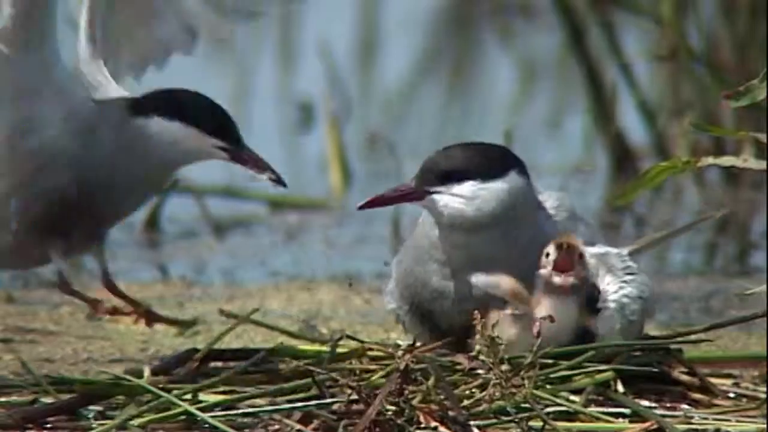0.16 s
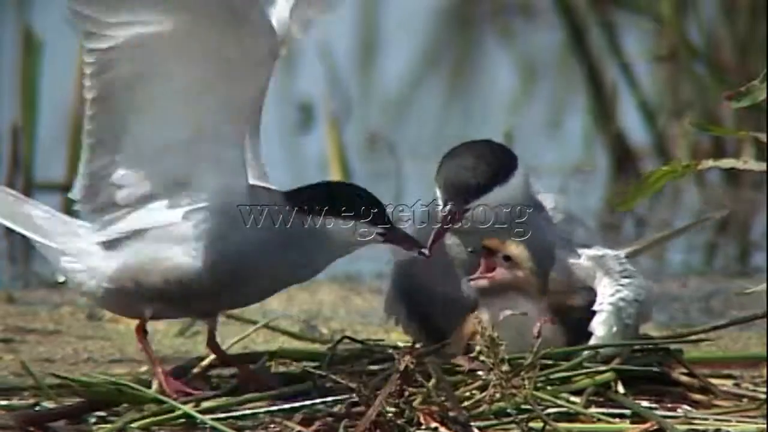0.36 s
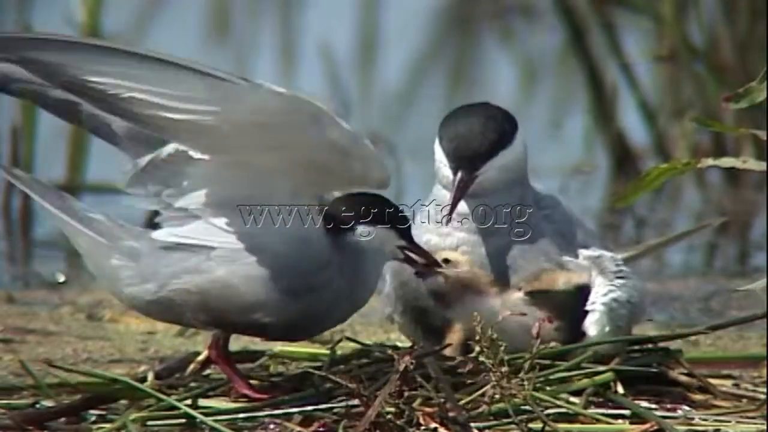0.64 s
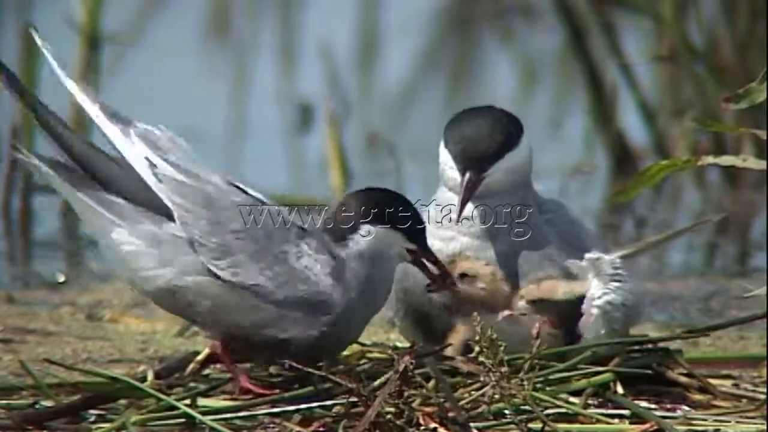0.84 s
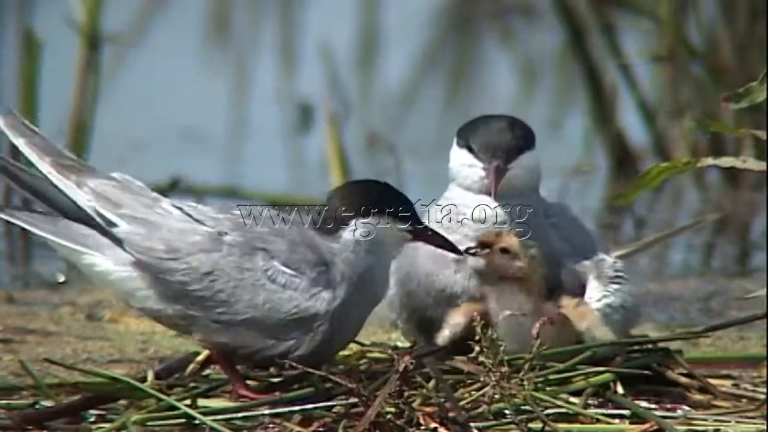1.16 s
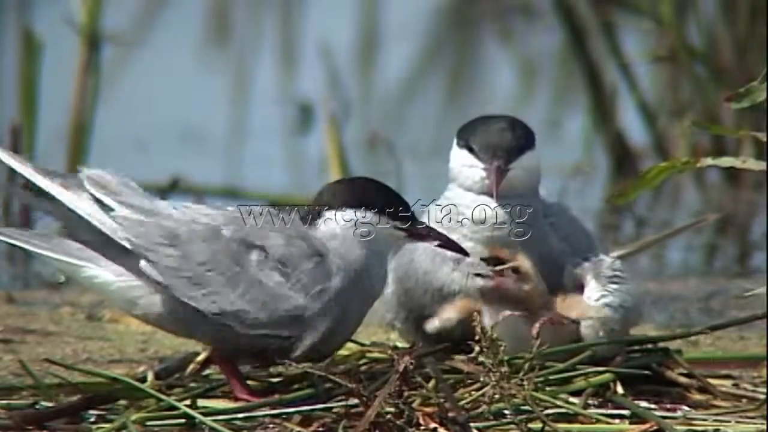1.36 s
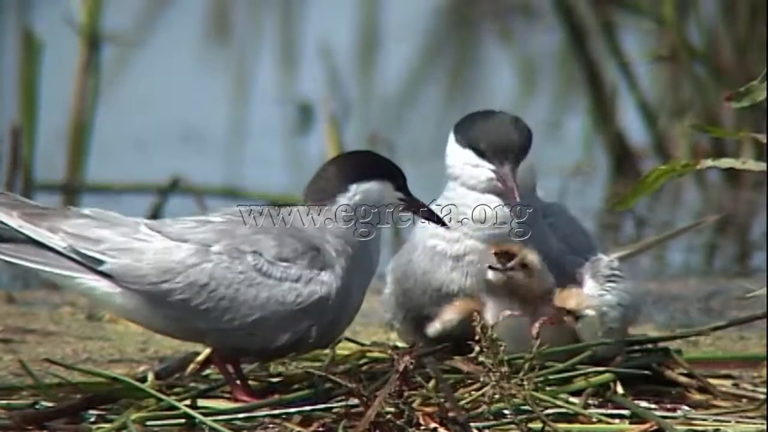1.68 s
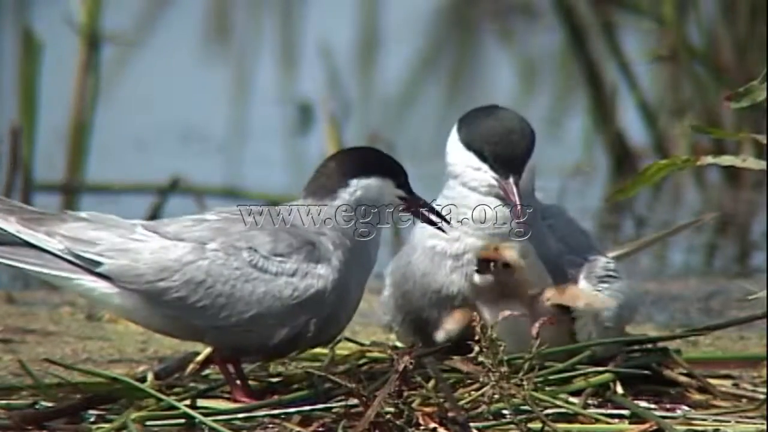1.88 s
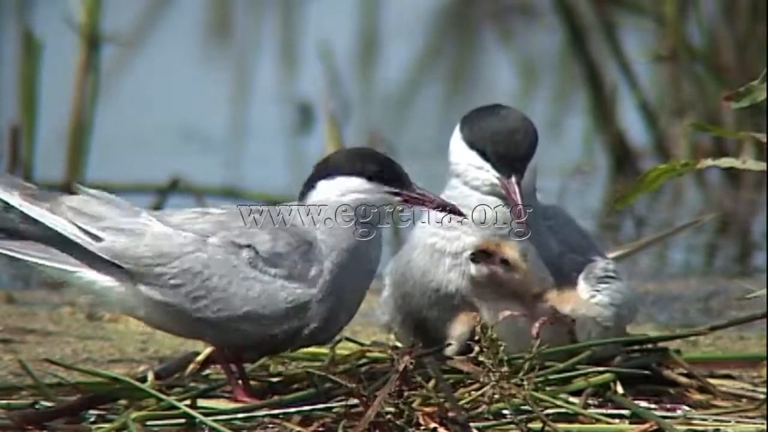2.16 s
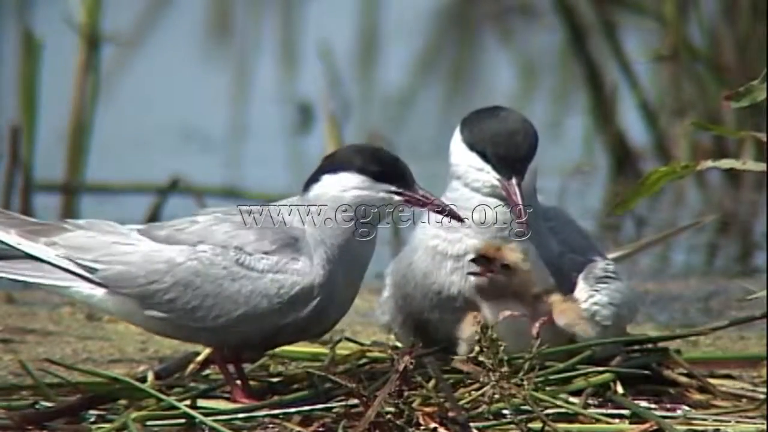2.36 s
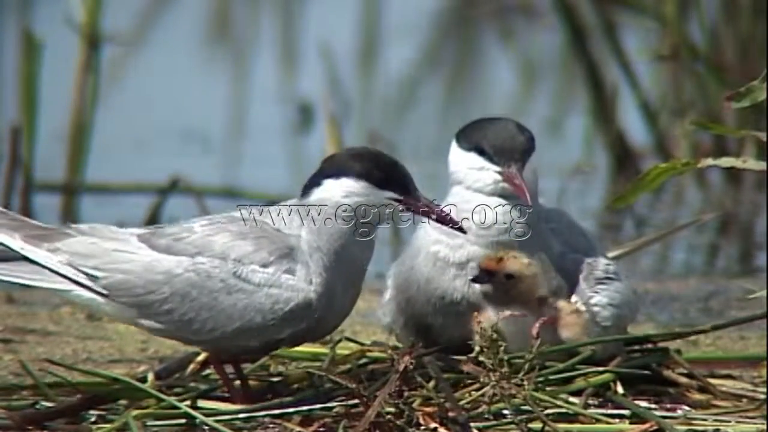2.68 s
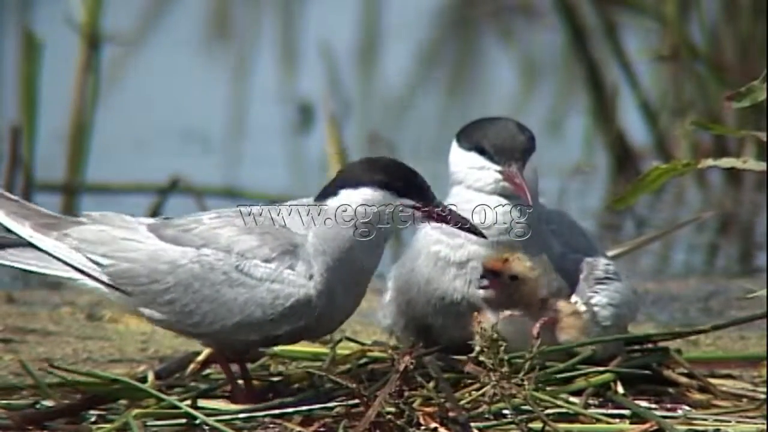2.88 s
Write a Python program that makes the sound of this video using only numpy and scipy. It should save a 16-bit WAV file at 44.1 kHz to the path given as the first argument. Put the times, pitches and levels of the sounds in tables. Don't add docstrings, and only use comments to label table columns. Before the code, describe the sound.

Terns rasp harshly close by, each call a rapidly throbbing 0.13-second burst: at 0.13, loudest at 1.0, weaker at 2.2 seconds. An abrupt opening brings distant rasps; a clear whistle dips at 0.25-0.45. Chick peeps, croaks and husky notes scatter throughout, with soft frog rattles near 0.35 and 1.65 and a tiny plop at 2.2. Wind rumble strengthens after 1.5 over faint colony hiss, nearly mono, with short reed echoes.

```python
import sys
import numpy as np
from scipy import signal
from scipy.fft import rfft, irfft
from scipy.io import wavfile
from scipy.ndimage import uniform_filter1d

SR = 44100
rng = np.random.default_rng(int(sys.argv[2]) if len(sys.argv) > 2 else 0)


def undo_db(level):
    steps = np.asarray(level, float) / 20
    return 10 ** steps


def to_wav(s):
    ch = np.atleast_2d(s).T
    pcm = np.round(np.clip(ch, -1, 1) * 32767)
    wavfile.write(sys.argv[1], SR, pcm.astype(np.int16))


N = 133623


def walk(n, rate):
    k = max(int(SR / rate), 1)
    return uniform_filter1d(uniform_filter1d(rng.standard_normal(n), k), k) * np.sqrt(2.2 * k)


def along(length_s):
    return np.linspace(0, 1, int(length_s * SR))


def table(points, hz):
    p = np.array(points, float)
    return np.interp(np.log(np.maximum(hz, 1)), np.log(p[:, 0]), p[:, 1], left=-80, right=-80)


def coloured(points, db):
    spectrum = rfft(rng.standard_normal(N))
    x = irfft(spectrum * undo_db(table(points, np.fft.rfftfreq(N, 1 / SR))), N)
    return x * undo_db(db) / x.std()


def add(out, start_s, x, db, attack_s=0.0013, release_s=0.0054):
    t = np.arange(len(x)) / SR
    ends = np.clip(np.minimum(t / attack_s, (t[-1] - t) / release_s), 0, 1)
    x = x * undo_db(db) / x.std() * ends
    i = int(start_s * SR)
    x = x[:N - i]
    out[i:i + len(x)] += x


def voice(hz, gain, rough, count):
    k = np.arange(1, count + 1)[:, None]
    flicker = 1 - rough + rough * walk((count, 9000), 550)[:, :len(hz)]
    phase = 2 * np.pi * np.cumsum(hz) / SR
    return np.sum(gain(k * hz) * flicker * np.sin(k * phase + k * k), axis=0)


def throb(bursts, duty, scatter_db, smear):
    x = np.clip((bursts % 1) / duty, 0, 1)
    size = undo_db(scatter_db * rng.standard_normal(40))[bursts.astype(int)]
    return (np.abs(np.sin(np.pi * x ** .6)) ** .8 + smear) * size


def near_rasps():
    # start in seconds, length in seconds, level in dB, throb in Hz, voice-organ pitch in Hz
    rasps = [
        (0.129, 0.13, -52.5, 103.8, 625.7),
        (1.0058, 0.13, -48.5, 99.9, 652),
        (2.214, 0.12, -56, 96.4, 519),
    ]
    # throat resonance at the start in Hz, at the end in Hz, its width in Hz,
    # slide time in seconds, every how many harmonics one is strong
    throats = [
        (3200, 2750, 500, .03, 5),
        (3850, 2350, 400, .013, 2),
        (3700, 3300, 800, .05, 2),
    ]
    # frequency in Hz, level in dB
    colour = [(900, -15.5), (1900, -4), (4500, -2), (6700, -7.5), (9400, -12.5), (11000, -22.5),
              (15000, -32)]
    dulling = (0.5, 0, -8)
    fading = (-1.5, -1, -2)
    peak_db, sag, jitter = 9, .06, .014

    out = np.zeros(N)
    for (start, length, db, rate, hz), throat, dull, fade in zip(rasps, throats, dulling, fading):
        first_hz, last_hz, wide, slide, every = throat
        u = along(length)
        t = u * length
        bursts = t * rate - 0.214 * (1 - np.exp(-t / 0.017))
        mouth = last_hz + (first_hz - last_hz) * np.exp(-(t / slide) ** 2)
        uneven = jitter * rng.standard_normal(40)[np.abs(bursts).astype(int)]
        pitch = hz * (1 + sag * (.4 - bursts % 1) + uneven)

        def gain(f):
            weak_db = -6 * (np.round(f / pitch) % every > 0) * (f > 3500)
            dull_db = dull * np.maximum(f / 1000 - 6, 0)
            resonance = 1 + undo_db(peak_db) / (1 + ((f - mouth) / wide) ** 2)
            return undo_db(table(colour, f) + weak_db + dull_db) * resonance

        x = voice(pitch, gain, rough=.42, count=22)
        x = x * throb(bursts, duty=.92 * (1 - 0.5 * u ** 2), scatter_db=1.2, smear=.06)
        add(out, start, x * undo_db(fade * u ** 2), db, attack_s=.0005, release_s=.002)
    return out


def far_rasps():
    # start in seconds, length in seconds, level in dB, throat in Hz, throat width as a share
    rasps = [(0.067, 0.038, -48.5, 1884, .25), (0.068, 0.034, -56, 5435, 0.17),
             (0.072, 0.067, -53, 3007, 0.19), (0.242, .11, -63.5, 5510, 0.28),
             (.345, 0.033, -66, 7270, 0.17), (0.442, 0.024, -60.5, 6500, 0.18),
             (.542, 0.11, -61.5, 2560, 0.44), (0.545, 0.082, -69.5, 5340, 0.17),
             (0.641, 0.18, -68.5, 5400, 0.15), (.705, 0.061, -56.5, 2117, 0.47),
             (.706, .05, -64, 5300, 0.23), (0.819, .02, -67.5, 5800, .1), (1.14, 0.15, -65, 2937, 0.28),
             (1.336, 0.028, -68.5, 6040, 0.11), (1.378, 0.092, -68, 5830, .1),
             (1.421, 0.12, -67.5, 3680, 0.25), (1.571, 0.0276, -57.5, 4250, 0.076),
             (1.572, 0.097, -61, 5640, 0.11), (1.598, 0.086, -68.5, 2392, 0.28),
             (1.807, 0.012, -60.5, 6110, 0.071), (1.955, 0.064, -67.5, 2480, 0.19),
             (2.051, 0.027, -61.5, 2310, 0.5), (2.098, 0.03, -61.5, 1920, 0.45)]
    more_rasps = [
        (.1, .15, -61, 5400, 0.22),
        (.385, .06, -77, 7600, .1),
        (2.11, .085, -74.5, 6300, 0.072),
        (2.16, 0.074, -61, 3540, 0.19),
        (2.285, 0.115, -58.5, 2504, 0.35),
        (2.84, .18, -74, 6250, 0.11),
        (2.55, 0.089, -71.5, 5850, 0.063),
        (2.68, 0.073, -63.5, 3180, 0.19),
        (2.768, 0.07, -67, 5770, 0.073),
        (2.84, .18, -72, 3550, 0.14),
    ]
    usual_hz, slide, throb_hz = 639, 0.0305, 100.2

    out = np.zeros(N)
    for start, length, db, centre, wide in rasps + more_rasps:
        u = along(length)
        pitch_luck, throb_luck = rng.standard_normal(2)
        mouth = centre * (1 + slide * (1 - 2 * u))
        pitch = mouth / np.round(centre / usual_hz) * (1 + 0.01064 * pitch_luck)
        x = voice(pitch, lambda f: 1 / (1 + ((f - mouth) / (wide * centre)) ** 4),
                  rough=min(.8, 0.44 + 2 * wide), count=14)
        bursts = u * length * throb_hz * (1 + .08 * throb_luck)
        add(out, start, x * throb(bursts, duty=.85, scatter_db=1.7, smear=.5), db, attack_s=.002)
    return out


def croaks():
    # start in seconds, length in seconds, level in dB, pitch in Hz, loudest near in Hz
    calls = [
        (1.29, 0.064, -60, 1170, 2100),
        (1.549, 0.05, -56, 1170, 2130),
        (2.097, 0.085, -59, 1170, 2250),
        (2.33, 0.046, -56.5, 1170, 2000),
        (2.655, 0.059, -66.5, 1260, 1200),
        (2.928, 0.069, -66.5, 1250, 1360),
        (2, .035, -64.5, 1800, 3500),
        (1.625, 0.055, -62.5, 2050, 2600),
    ]
    out = np.zeros(N)
    for start, length, db, hz, centre in calls:
        u = along(length)
        x = voice(hz * (1 - 0.05 * u ** 2), lambda f: 1 / (1 + ((f - centre) / 650) ** 2),
                  rough=.6 if hz < 1200 else .15, count=5)
        add(out, start, x * np.exp(-u), db)
    return out


def husky_notes():
    # start in seconds, length in seconds, level in dB, start pitch in Hz, end pitch in Hz
    glides = [(0.062, 0.028, -69.5, 7750, 7600), (0.069, 0.025, -75, 11200, 11000),
              (0.261, .11, -83, 11500, 11800), (.35, .025, -75, 11700, 11500),
              (.43, .04, -81, 11800, 11500), (0.547, .055, -70.5, 6050, 5900),
              (0.561, 0.091, -61.5, 2950, 2350), (.56, .07, -83, 9900, 9800), (.63, 0.091, -66, 5050, 5700),
              (0.713, .095, -66.5, 5650, 5150), (.75, .04, -68, 2300, 1900),
              (1.17, 0.11, -72.5, 2050, 1850), (1.2, .045, -71, 3700, 3900), (1.573, .085, -78, 8300, 8100),
              (1.601, 0.064, -64, 2950, 2650), (1.69, 0.023, -70, 5400, 5500),
              (1.72, .2, -75.5, 3650, 3950), (1.817, 0.043, -77, 6600, 6700),
              (2.246, 0.027, -61.5, 5200, 5150), (2.398, .11, -71.5, 2450, 2250),
              (2.488, 0.094, -77, 4500, 4550), (2.52, 0.079, -71, 3000, 3150),
              (2.685, 0.058, -72.5, 1900, 1850), (2.742, 0.16, -76, 3780, 3760),
              (2.901, 0.062, -69, 3300, 3100), (2.95, 0.033, -73, 5030, 5000),
              (2.97, 0.073, -69, 3500, 3350)]
    out = np.zeros(N)
    for start, length, db, first_hz, last_hz in glides:
        u = along(length)
        wobble = 1 + .012 * walk(9000, 150)[:len(u)]
        x = voice((first_hz + (last_hz - first_hz) * u) * wobble, lambda f: 1, rough=.45, count=1)
        add(out, start, x, db, attack_s=.006, release_s=.01)
    return out


def long_whistle():
    # time in seconds, pitch in Hz, level in dB
    path = [
        (0.25, 3540, -55),
        (0.27, 3550, -50.5),
        (0.308, 3376, -53.5),
        (0.338, 3566, -53),
        (0.352, 3500, -61),
        (0.364, 3572, -58),
        (0.392, 3510, -70),
        (0.416, 3651, -71),
        (0.45, 3630, -67),
    ]
    times, pitches, levels = np.array(path).T
    length = times[-1] - times[0]
    t = times[0] + along(length) * length
    level = undo_db(np.interp(t, times, levels) + 1.1 * walk(len(t), 90))
    x = voice(np.interp(t, times, pitches), lambda f: 1, rough=0.16, count=1) * level
    out = np.zeros(N)
    add(out, times[0], x, 20 * np.log10(x.std() * np.sqrt(2)))
    return out


def bird_note(out, start, length, db, hz, arch, wobble):
    u = along(length)
    pitch_walk, level_walk = walk((2, 9000), 80)[:, :len(u)]
    bend = arch * np.abs(2 * u - 1.05) ** 2.58
    x = voice(hz * (1 - bend + wobble * pitch_walk), lambda f: 1, rough=0.11, count=1)
    add(out, start, x * undo_db(level_walk - 56 * bend), db, attack_s=.004, release_s=.006)


def level_whistles():
    # start in seconds, length in seconds, level in dB, pitch in Hz
    calls = [
        (.525, 0.063, -63.5, 3300),
        (2.605, 0.089, -69.5, 3100),
        (2.665, 0.069, -66.5, 3774),
        (2.668, 0.07, -72, 5020),
        (2.62, 0.054, -70, 4500),
        (2.79, 0.061, -69, 3090),
        (2.88, 0.078, -67.5, 4680),
        (2.94, 0.051, -64.5, 3816),
    ]
    out = np.zeros(N)
    for row in calls:
        bird_note(out, *row, arch=0, wobble=0.0091)
    return out


def chick_peeps():
    # start in seconds, length in seconds, level in dB, top pitch in Hz
    calls = [(.457, 0.049, -65, 4720), (.826, 0.056, -68.5, 4520), (1.185, 0.06, -68, 4570),
             (1.312, 0.061, -69.5, 4750), (1.457, 0.037, -66.5, 4760), (1.528, 0.057, -65, 4550),
             (1.605, 0.042, -66, 4700), (1.765, 0.047, -68, 4750), (1.81, 0.016, -63, 4230),
             (1.94, 0.038, -66.5, 4700), (2.103, 0.063, -66.5, 4660), (2.28, 0.044, -65, 4840),
             (2.4, 0.054, -66, 4600), (2.44, 0.058, -65.5, 4850), (2.618, 0.057, -65.5, 4780),
             (2.81, 0.05, -65, 4680), (2.995, .04, -64.5, 4780)]
    out = np.zeros(N)
    for row in calls:
        bird_note(out, *row, arch=0.159, wobble=0.0029)
    return out


def frog():
    # first grunt in seconds, number of grunts, spacing in seconds, level in dB
    rattles = [
        (.334, 8, .0392, -61),
        (1.65, 7, .0395, -60),
    ]
    sac_hz, sac_width_hz, grunt_s, click_hz = 1270, 200, .033, 260
    band = signal.butter(2, [850, 1750], "band", fs=SR)
    t = np.arange(int(grunt_s * SR)) / SR
    out = np.zeros(N)
    for start, count, gap, db in rattles:
        for k in range(int(count)):
            click_luck, sac_luck, level_luck = rng.standard_normal(3)
            since = (t * click_hz * (1 + 0.053 * click_luck) % 1) / click_hz
            ring = np.sin(2 * np.pi * sac_hz * (1 + 0.026 * sac_luck) * since)
            x = np.exp(-np.pi * sac_width_hz * since) * ring
            x = signal.lfilter(*band, x * (.8 + .35 * walk(len(t), 600)))
            swell_db = -4 * (1 - k / 4.5) ** 2
            add(out, start + k * gap, x, db + swell_db + level_luck, attack_s=.011, release_s=.011)
    return out


def plop():
    bubble = (2.198, -52, 1020, .011, .15)
    start, db, hz, length, glide = bubble
    u = np.arange(int(length * SR)) / (length * SR)
    x = np.sin(2 * np.pi * np.cumsum(hz * (1 + glide * u)) / SR) * np.exp(-1.5 * u)
    out = np.zeros(N)
    add(out, start, x, db, attack_s=.002, release_s=.004)
    return out


def reed_echo(calls):
    t60_s, echo_db = .1, -11
    t = np.arange(9000) / SR
    tail = rng.standard_normal(9000) * np.exp(-np.log(1000) * t / t60_s) * (t > .004)
    return undo_db(echo_db) * signal.fftconvolve(calls, tail / np.sqrt(np.sum(tail ** 2)))[:N]


def wind():
    # time in seconds, level in dB
    gusts = [(.08, -56), (.35, -60.5), (.7, -64.5), (.86, -58.5), (.95, -48.5), (1.05, -56.5),
             (1.22, -52.5), (1.42, -60), (1.58, -49.5), (1.85, -50.5), (2.05, -49), (2.5, -48.5),
             (2.66, -49), (3.03, -50.5)]
    # frequency in Hz, level in dB
    rumble = [(14, -44), (25, -13.5), (50, 0.5), (97, 0), (198, -12), (416, -30.5), (700, -41.5),
              (1000, -70)]
    # start in seconds, length in seconds, level in dB, top frequency in Hz
    slap = (.89, 0.08, -63.5, 450)

    t = np.arange(N) / SR
    times, levels = np.array(gusts).T
    x = coloured(rumble, 0) * undo_db(np.interp(t, times, levels) + 1.5 * walk(N, 13))
    start, length, db, top_hz = slap
    slap_noise = coloured([(120, 0), (top_hz, -3), (2.9 * top_hz, -22)], 0)[:int(length * SR)]
    add(x, start, slap_noise, db, attack_s=.03, release_s=.04)
    thump = coloured([(60, 6), (900, -10.5)], -56)
    return x + thump * np.clip((t - 3.022) / 0.0069, 0, 1)


def marsh():
    # frequency in Hz, level in dB
    colour = [(180, -24), (300, -3), (1230, -5), (1660, -7), (4660, -6.5), (7430, -20), (16000, -23)]
    spectrum, f = rfft(coloured(colour, -65)), np.fft.rfftfreq(N, 1 / SR)
    edges = [0, 900, 1600, 2300, 3000, 3900, 5000, 6800]
    out = irfft(spectrum * (f >= edges[-1]), N)
    for lo, hi in zip(edges, edges[1:]):
        out = out + irfft(spectrum * (f >= lo) * (f < hi), N) * undo_db(2 * walk(N, 18))
    return out


def camera_whine():
    # frequency in Hz, rms level in dB
    tones = [(15625, -99.5)]
    t = np.arange(N) / SR
    return sum(undo_db(db) * np.sqrt(2) * np.sin(2 * np.pi * hz * t) for hz, db in tones)


def side_hiss():
    # frequency in Hz, level in dB
    colour = [(200, -11), (585, -2.5), (2000, -14.5), (6000, -3), (12000, -1), (15500, -14)]
    return coloured(colour, -86.5)


def scene():
    calls = near_rasps() + far_rasps() + croaks() + husky_notes() + long_whistle()
    calls = calls + level_whistles() + chick_peeps() + frog() + plop()
    mid = calls + reed_echo(calls) + wind() + marsh() + camera_whine()
    side = side_hiss()
    return np.array([mid + side, mid - side])


def band_limit(x):
    return signal.sosfilt(signal.butter(12, 15650, fs=SR, output="sos"), x)


def record(dry):
    start_s, opening_s = .0693, 0.00053
    t = np.arange(N) / SR
    mix = dry * np.clip((t - start_s) / opening_s, 0, 1)
    return band_limit(mix)


dry = scene()
out = record(dry)
to_wav(out)
```